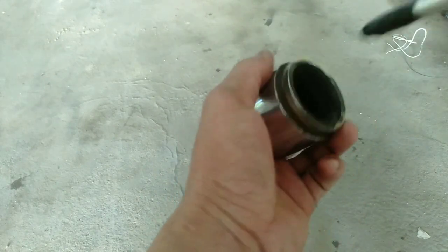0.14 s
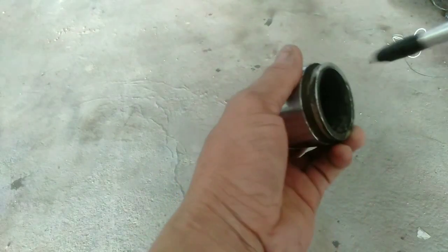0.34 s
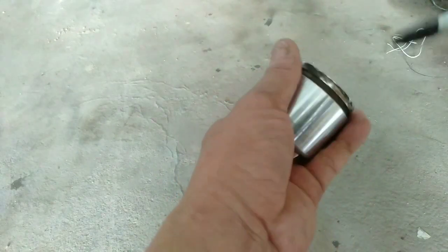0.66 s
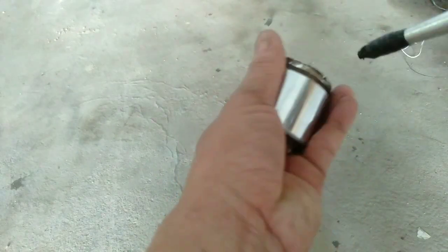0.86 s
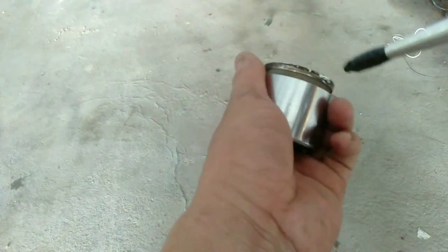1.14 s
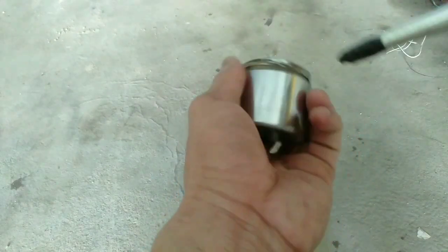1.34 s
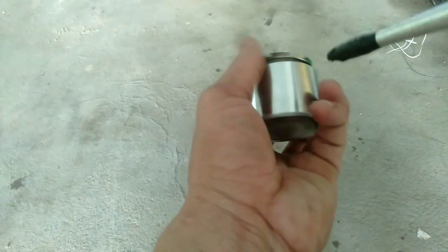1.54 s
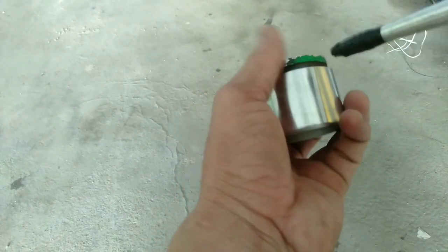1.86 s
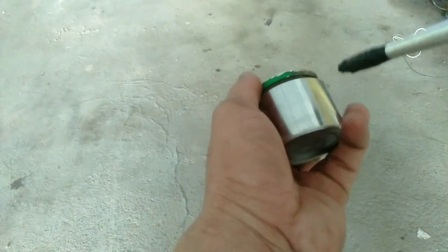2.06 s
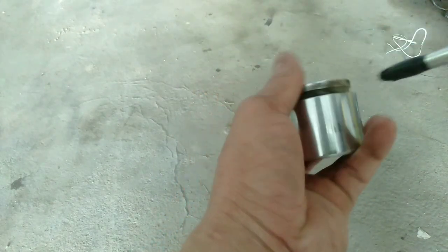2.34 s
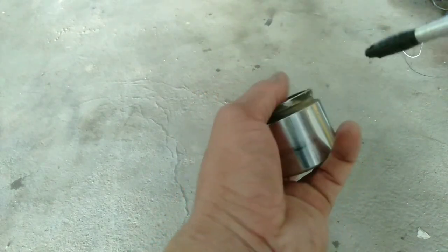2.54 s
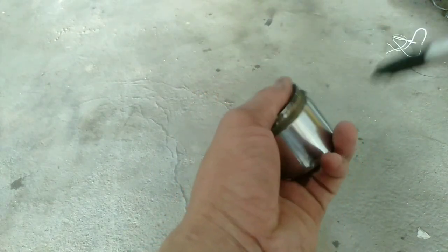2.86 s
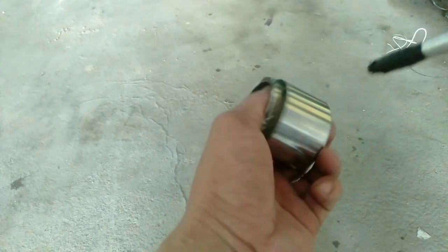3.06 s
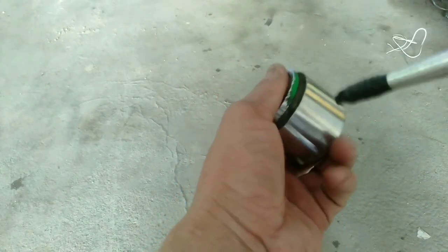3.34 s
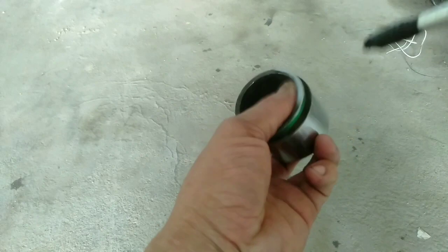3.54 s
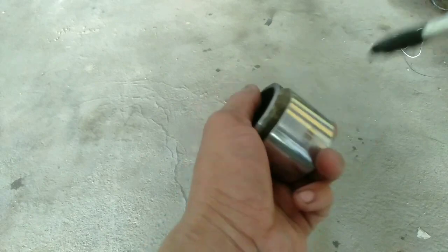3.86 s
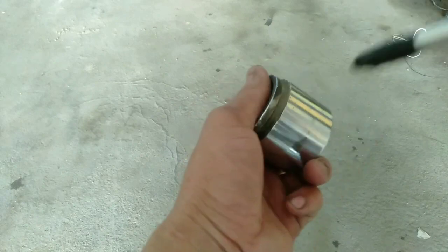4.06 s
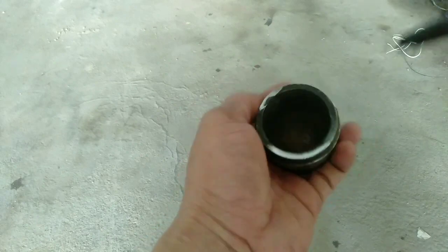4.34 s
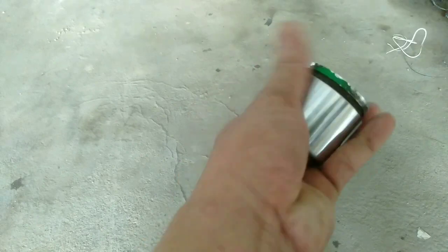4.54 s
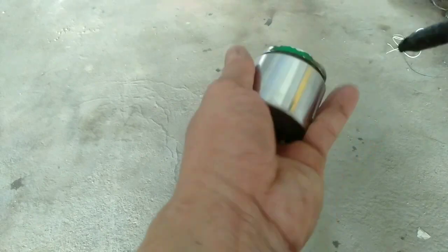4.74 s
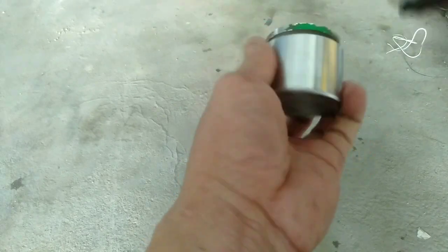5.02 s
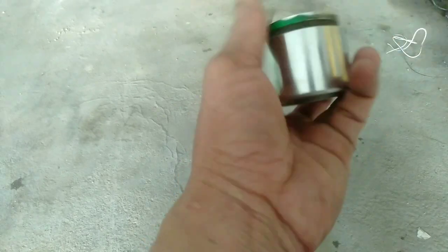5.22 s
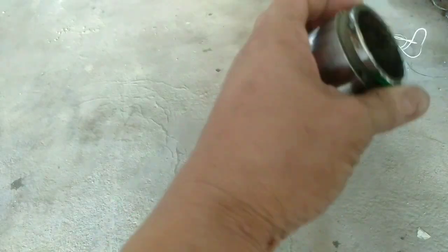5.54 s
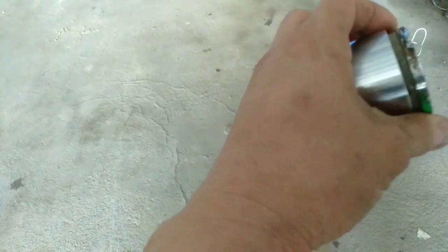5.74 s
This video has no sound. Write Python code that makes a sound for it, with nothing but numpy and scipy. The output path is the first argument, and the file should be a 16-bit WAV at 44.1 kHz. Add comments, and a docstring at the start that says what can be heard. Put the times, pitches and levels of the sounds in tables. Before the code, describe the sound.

Close to the microphone in a workshop, a compressed-air blow gun fires eight bursts of uneven length at a small steel cup turned in the hand. Each burst hisses brightly, with a fluttering roar and a breathy whistle on the rim. In the short gaps a weak stream sighs across the hollow, and grit ticks twice on the steel. Stray air puffs softly on the microphone over a faint room rumble.

```python
"""Blow gun on a steel cup

In a workshop, close to the microphone, eight bursts of compressed air clean a small steel cup
turned in the hand. The nozzle hisses brightly; where the jet strikes cup and fingers it roars,
flutters and whistles on the rim. Between bursts a weak stream sighs across the hollow, and grit
ticks twice on the steel. Stray air puffs on the microphone, over a faint room rumble."""
import sys
import numpy as np
from scipy.fft import rfft, irfft, next_fast_len
from scipy.io import wavfile
from scipy.ndimage import map_coordinates

SR = 44100
rng = np.random.default_rng(int(sys.argv[2]) if len(sys.argv) > 2 else 0)


def put_to_file(sound):
    """Save the sound as 16-bit audio at rate SR, in the file named by the first command-line argument."""
    columns = np.atleast_2d(sound).T  # one column per channel
    safe = np.clip(columns, -1, 1)
    whole_steps = np.round(safe * 32767)
    wavfile.write(sys.argv[1], SR, whole_steps.astype(np.int16))


N = 259308
T = np.arange(N) / SR

# Noise spectra of the jet, the weak stream and the room: f/Hz, relative density/dB
BUFFET_SPECTRUM = [(20, -11), (60, -11.5), (105, -8.5), (135, 0.5), (200, -1), (320, -4), (550, -1.5),
                   (800, -2), (1300, -7.5), (3000, -33), (8000, -80)]
ROAR_SPECTRUM = [(150, -49), (500, -6), (850, -1.5), (1400, 0), (2100, -2.5), (3000, -8.5), (4200, -13),
                 (6000, -17), (10000, -18.5), (16000, -27)]
HISS_SPECTRUM = [(500, -54), (2500, -3.5), (5500, -12.5), (9000, -10.5), (11500, -7.5), (13000, -4.5),
                 (14500, 0.5), (15700, 4.5), (16500, -3.5)]
SIGH_SPECTRUM = [(100, -24), (420, -26), (660, -5.5), (880, -8), (1300, 1.5), (2400, -2.5), (3300, -4.5),
                 (4100, -4), (5600, -7.5), (7100, 2), (8800, -8), (12000, -16.5), (15700, -28)]
ROOM_SPECTRUM = [(20, -4), (40, -10), (65, -19), (150, -21), (400, -28), (800, -25), (3000, -32)]
# Trigger squeezes: open t/s, shut t/s, rise/s, fall/s,
# relative levels of hiss/dB, buffeting/dB and rim whistle/dB, rim f/Hz
SQUEEZES = [(.064, .699, 0.026, 0.036, -31, -5.5, -11, 7400),
            (.778, 2.335, .016, 0.03, -30, -4.5, -13.5, 7290),
            (2.458, 3.229, .029, 0.037, -32, -4, -14, 7490),
            (3.345, 3.708, 0.031, 0.065, -33, -3.5, -12, 7520),
            (3.853, 4.514, 0.056, 0.09, -32, -3, -12.5, 7260),
            (4.631, 5.082, .014, 0.032, -32.5, -3.5, -14, 7140),
            (5.213, 5.353, 0.01, 0.022, -33, -4.5, -15, 7300),
            (5.456, 5.889, 0.03, 0.029, -31.5, -6.5, -13.5, 7200)]
# How squarely the jet strikes the cup, one curve a burst: t/s, relative roar level/dB
AIM_CURVES = [
    [(0.09, -28), (0.226, -32.5), (0.23, -30), (0.372, -30), (0.398, -33.5), (0.436, -29.5), (0.644, -29.5),
     (0.666, -27), (0.68, -28.5)],
    [(0.8, -35), (0.808, -33.5), (0.842, -38), (0.884, -29), (0.984, -39), (1.048, -32.5), (1.122, -35),
     (1.32, -29), (1.376, -31), (1.732, -29), (1.762, -33.5), (1.846, -30.5), (1.858, -32), (2.154, -30),
     (2.192, -34.5), (2.254, -30.5), (2.288, -37), (2.31, -26)],
    [(2.485, -35), (2.557, -28), (2.605, -30), (3.059, -28.5), (3.067, -29), (3.075, -30), (3.19, -28.5)],
    [(3.375, -29.5), (3.607, -28.5), (3.65, -30.5)],
    [(3.89, -31.5), (3.918, -29.5), (4.116, -28), (4.13, -31), (4.228, -31), (4.234, -27.5), (4.292, -28),
     (4.432, -29), (4.45, -30.5)],
    [(4.655, -31.5), (4.661, -29.5), (4.835, -29), (4.841, -28), (5.05, -29.5)],
    [(5.23, -35.5), (5.242, -32), (5.314, -30.5), (5.325, -28.5)],
    [(5.49, -31), (5.596, -26.5), (5.694, -31.5), (5.736, -27), (5.818, -30), (5.86, -26.5)],
]
# Brief swells and dips of the hiss: t/s, gain/dB, half-length/s
HISS_FLARES = [(.79, -1, .03), (0.895, 2.5, 0.044), (2.3, -3, 0.087), (3.0, 0.5, .12), (4.3, -2, .05)]
# Air catching an edge or the cup's mouth: t/s, level/dB, half-length/s, f/Hz, half-width/Hz
EDGE_WHISTLES = [(0.021, -49, 0.009, 10000, 450), (0.363, -36, .016, 7350, 350),
                 (.666, -43, 0.0083, 5000, 180), (0.67, -28, 0.02, 1590, 190),
                 (2.312, -31, 0.0074, 1000, 600), (3.497, -29, .007, 2200, 1800),
                 (4.112, -37, .012, 7360, 700), (4.31, -28.5, 0.04, 1452, 300),
                 (4.645, -39, 0.0069, 3800, 303), (5.603, -36, .02, 7250, 260.7),
                 (5.746, -37, 0.02, 7140, 260), (5.847, -34, .01, 7260, 229)]
# The cup's hollow after each burst: shut t/s, relative level/dB, f/Hz, glide/(Hz/s)
HOLLOW_NOTES = [(-.07, -51, 1520, -800), (.699, -29, 1590, -1100), (2.335, -43, 1570, -500),
                (3.229, -34.5, 1330, -1400), (3.708, -40.5, 1282, 100), (4.514, -44.5, 1396, 400.5),
                (5.082, -43, 1560, -200), (5.353, -36.5, 1515, 1100)]
# Grit striking the cup: t/s, relative level/dB
GRIT_HITS = [(2.413, -27), (5.174, -27.5)]
# Modes of the hand-held steel: f/Hz, relative level/dB, t60/s
STEEL_MODES = [(9740, 1.5, 0.0091), (10200, -18, .008), (7400, -12, .005), (3300, -5, .005)]
# Stray air on the microphone: t/s, envelope level/dB, half-length/s, f/Hz
MIC_PUFFS = [(0.688, -30.5, 0.0047, 220), (.742, -49, .01, 40), (0.783, -36, 0.0073, 35),
             (2.374, -58, .008, 70), (2.41, -52, 0.0071, 60), (3.27, -56, 0.011, 45),
             (3.74, -56, .01, 45.3)]

USUAL_ROAR_DB = -29.5  # reference for the aim curves
BUFFET_GROWS, RIM_GROWS, HISS_GROWS = 1.14, 1.43, .25  # dB gained per dB of aim
CHIRP_DB, CHIRP_DELAY_S, CHIRP_S = -38.5, .017, .008
# The weak stream's layers, either side of a knee just after the valve shuts: rise, fade in dB/s
HOLLOW_SLOPES, SIGH_SLOPES, LEAK_SLOPES = (105, 92), (95, 89), (-20, 250)
KNEE_S, SIGH_DB, LEAK_DB = .056, -40, -47  # time after shutting, levels at the knee
TOP_HZ = 15810


def jet(opening):
    """Roar, rim whistle and hiss all follow the hand's aim and shake with the same eddies."""
    roar_db = np.interp(T, *np.concatenate(AIM_CURVES).T)
    aim_db = roar_db - USUAL_ROAR_DB + .5 * wobble(22.03)
    eddies_db = .5 * wobble(45) + .67 * wobble(170) + .48 * wobble(900)
    return (cup_roar(aim_db, eddies_db) + rim_whistle(opening, aim_db, eddies_db)
            + nozzle_hiss(aim_db, eddies_db))


def cup_roar(aim_db, eddies_db):
    """The jet breaks on cup and fingers: a roar and low buffeting that need full pressure."""
    *_, buffet_db, _, _ = held(SQUEEZES)
    flutter_db = eddies_db + 1.4 * wobble(50)
    buffet_gain = amp(USUAL_ROAR_DB + buffet_db - 2 + BUFFET_GROWS * aim_db + flutter_db)
    buffet = buffet_gain * rush(BUFFET_SPECTRUM)
    roar = amp(USUAL_ROAR_DB - .95 + aim_db + eddies_db) * rush(ROAR_SPECTRUM)
    return (buffet + roar) * valve(lag_s=.0036) ** .93


def nozzle_hiss(aim_db, eddies_db):
    """The free jet hisses just after the valve opens, even at low pressure."""
    *_, hiss_db, _, _, _ = held(SQUEEZES)
    flare_db = sum(db * bell(at, length) for at, db, length in HISS_FLARES)
    gain = amp(hiss_db - .8 + flare_db + HISS_GROWS * aim_db + .79 * eddies_db)
    return gain * rush(HISS_SPECTRUM) * valve(lag_s=.0045) ** .44


def rim_whistle(opening, aim_db, eddies_db):
    """The rim chirps as the valve opens; its breathy whistle wanders as the jet shifts on the edge."""
    opens, *_, rim_db, rim_hz = held(SQUEEZES)
    flutter_db = .5 * eddies_db + 2.5 * wobble(30)
    gain = amp(USUAL_ROAR_DB + rim_db - .9 + RIM_GROWS * aim_db + flutter_db)
    whistle = gain * resonance(rim_hz + 130 * wobble(12), width_hz=810)
    chirp = amp(CHIRP_DB) * bell(opens + CHIRP_DELAY_S, CHIRP_S) * resonance(rim_hz, width_hz=680)
    return whistle * opening ** .44 + chirp


def edge_whistles():
    """Bands of turbulence whistle or rasp briefly as the air sweeps past an edge."""
    return sum(amp(db) * bell(at, length) * resonance(hz, width)
               for at, db, length, hz, width in EDGE_WHISTLES)


def weak_stream(opening):
    """Slow air sighs and sounds the hollow, pitched by the covering hand; the nozzle's hiss drains."""
    shut, hollow_db, hollow_hz, glide = held(HOLLOW_NOTES)
    age = np.clip(T - shut, 0, .2)

    def swell_db(rise, fade):
        return rise * np.minimum(age - KNEE_S, 0) - fade * np.maximum(age - KNEE_S, 0)

    hollow_gain = amp(hollow_db - 4.5 + swell_db(*HOLLOW_SLOPES))
    hollow = hollow_gain * resonance(hollow_hz + glide * age, width_hz=170)
    sigh = amp(SIGH_DB + swell_db(*SIGH_SLOPES) + 1.7 * wobble(60)) * rush(SIGH_SPECTRUM)
    leak = amp(LEAK_DB + swell_db(*LEAK_SLOPES)) * rush(HISS_SPECTRUM)
    return (hollow + sigh + leak) * np.sqrt(1 - opening ** 2)


def grit(crack_db=-3, crack_t60=.004):
    """Each grain gives a crack and a ring of steel that the hand damps at once."""
    ticks, t = np.zeros(N + SR), T[:SR // 10]
    ring = sum(amp(db - 60 * t / t60) * np.sin(2 * np.pi * hz * t) for hz, db, t60 in STEEL_MODES)
    for at, db in GRIT_HITS:
        crack = amp(crack_db - 60 * t / crack_t60) * rng.standard_normal(len(t))
        ticks[round(at * SR):][:len(t)] += amp(db - 1) * (ring + crack)
    return ticks[:N]


def mic_puffs():
    """Deflected air pushes softly on the microphone."""
    return sum(amp(db) * bell(at, length) * np.sin(2 * np.pi * hz * (T - at))
               for at, db, length, hz in MIC_PUFFS)


def room_tone():
    """The workshop rumbles faintly in the background."""
    return amp(-58.5) * rush(ROOM_SPECTRUM)


def valve(lag_s=0):
    """How far the valve stands open, 0-1; with a lag, the pressure that rises after it."""
    opens, shut, rise, fall, *_ = held(SQUEEZES)
    return np.clip(np.minimum((T - opens - lag_s) / rise, (shut - T) / fall), 0, 1)


def held(rows):
    """Each row's values, held per sample from its time until the next row's."""
    rows = np.array(rows)
    return rows[np.maximum(np.searchsorted(rows[:, 0], T) - 1, 0)].T


def amp(db):
    """Decibels to gain."""
    return 10 ** (np.asarray(db) / 20)


def unit(x):
    """Scale to rms 1."""
    return x / np.sqrt(np.mean(x ** 2) + 1e-20)


def bell(at, half_length):
    """A Gaussian swell of height 1."""
    return np.exp(-((T - at) / half_length) ** 2)


def wobble(rate):
    """A smooth random curve of rms 1, rate knots a second."""
    knots = rng.standard_normal(int(N * rate / SR) + 4)
    return unit(map_coordinates(knots, [T * rate]))


def filtered(x, response):
    """Filter x by a gain that is a function of frequency."""
    size = next_fast_len(N + 8192)
    return irfft(rfft(x, size) * response(np.fft.rfftfreq(size, 1 / SR)), size)[..., :N]


def rush(spectrum):
    """Noise of rms 1, shaped by points of f/Hz, level/dB."""
    f, db = np.transpose(spectrum)
    white = rng.standard_normal(N)
    return unit(filtered(white, lambda hz: amp(np.interp(np.log(hz + 1), np.log(f), db))))


def resonance(centre_hz, width_hz):
    """Noise of rms 1 in a resonance whose centre may move."""
    i, q = filtered(rng.standard_normal((2, N)), lambda hz: 1 / (1 + (hz / width_hz) ** 2))
    phase = 2 * np.pi * np.cumsum(centre_hz * np.ones(N)) / SR
    return unit(i * np.cos(phase) + q * np.sin(phase))


def scene():
    """One microphone close to the cup feeds both channels."""
    opening = valve()
    air = jet(opening) + weak_stream(opening) + edge_whistles()
    mono = air + grit() + mic_puffs() + room_tone()
    return np.array([mono, mono])


def record(dry):
    """The camera's microphone channel passes nothing above its band limit."""
    return filtered(dry, lambda hz: hz < TOP_HZ)


dry = scene()
out = record(dry)
put_to_file(out)
```